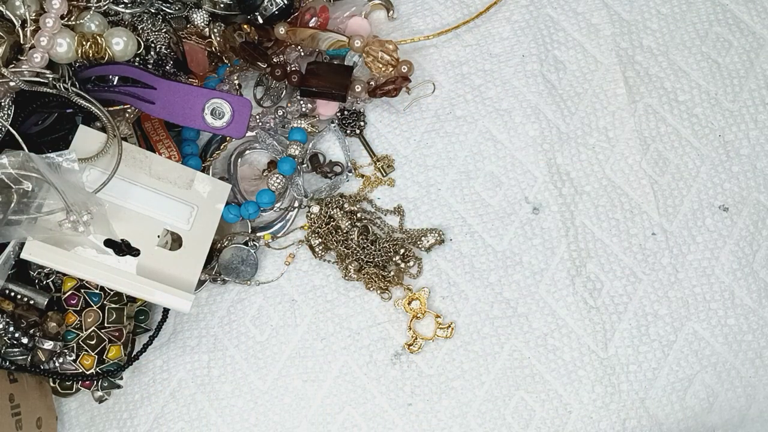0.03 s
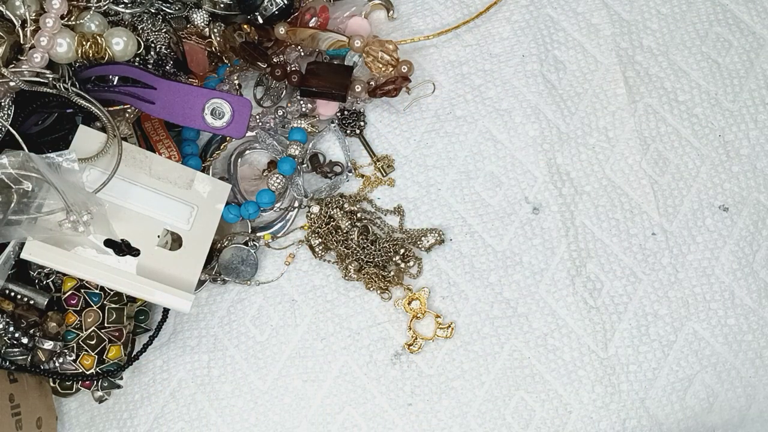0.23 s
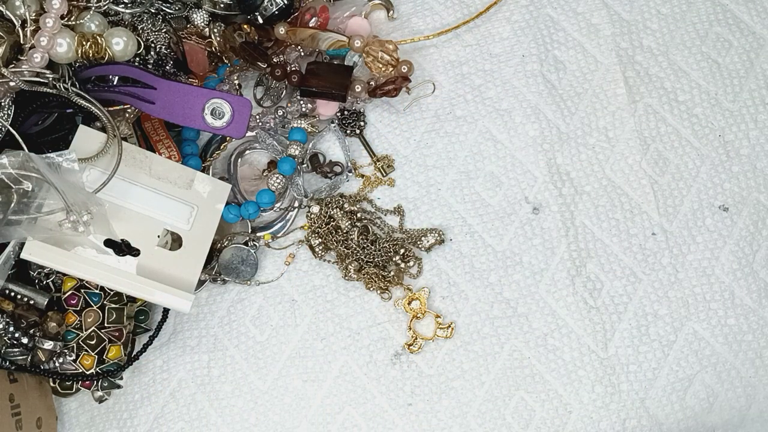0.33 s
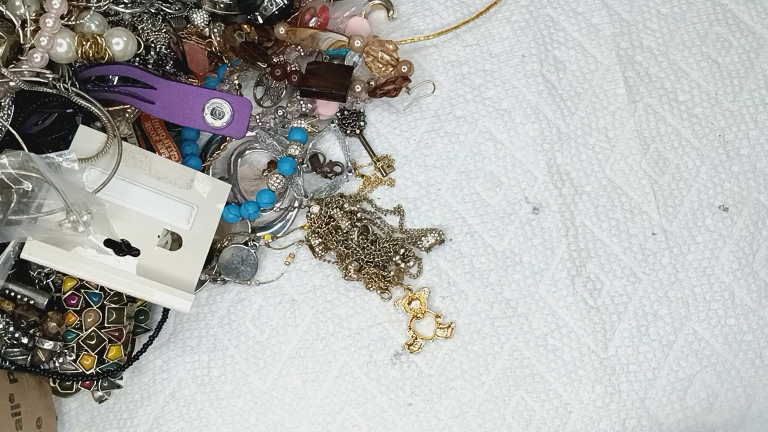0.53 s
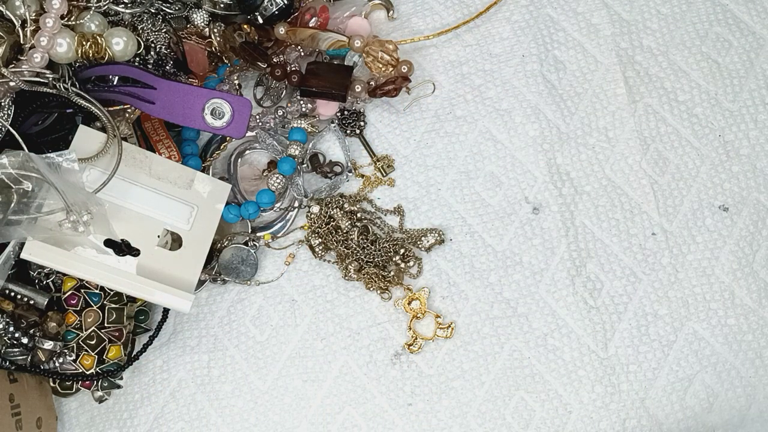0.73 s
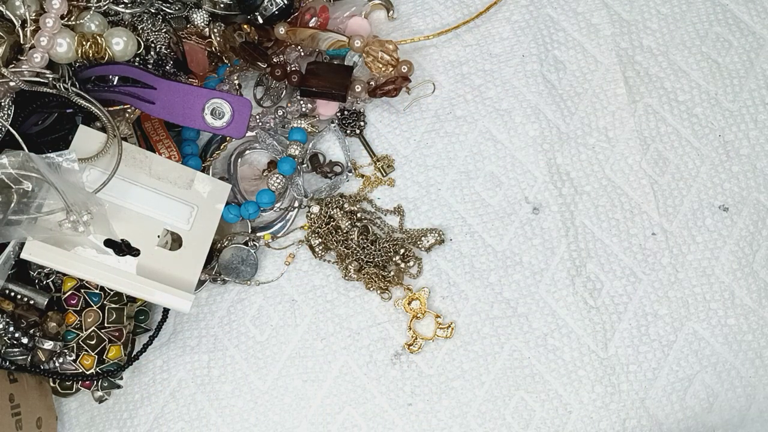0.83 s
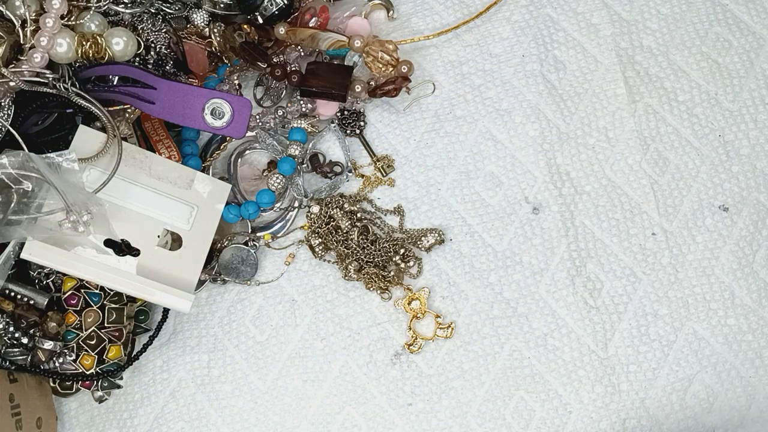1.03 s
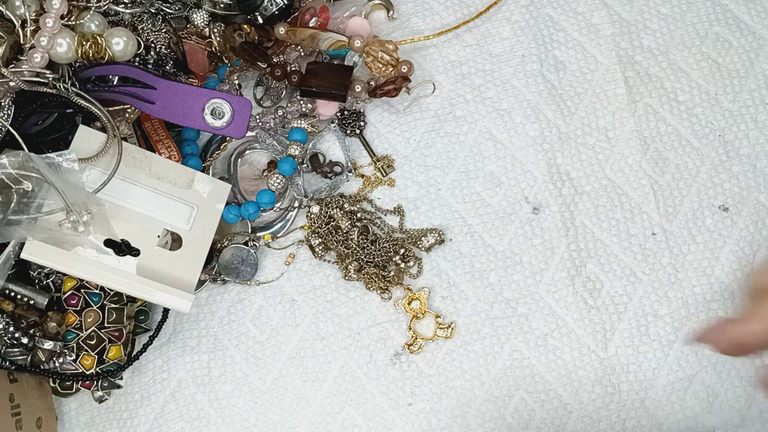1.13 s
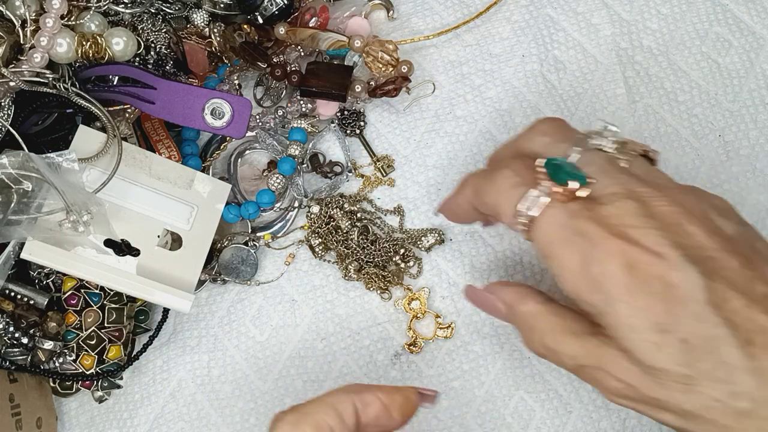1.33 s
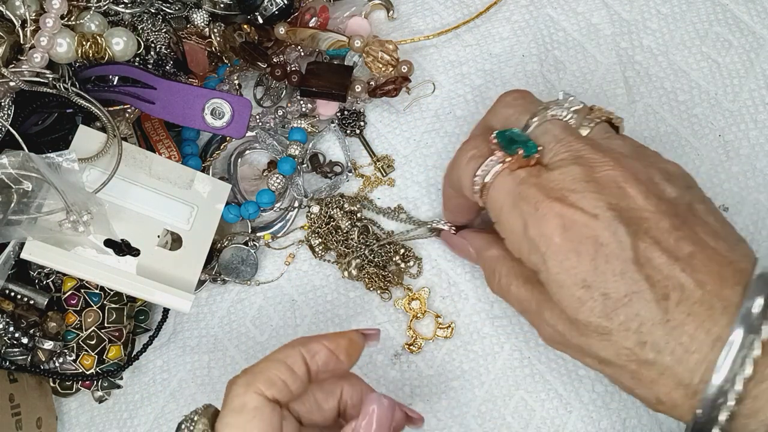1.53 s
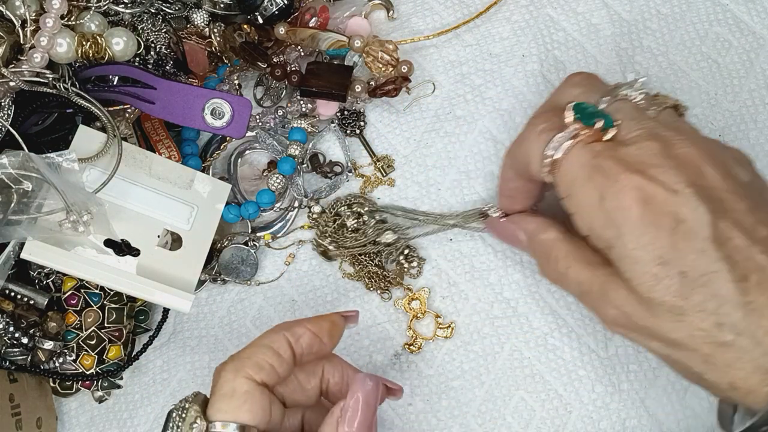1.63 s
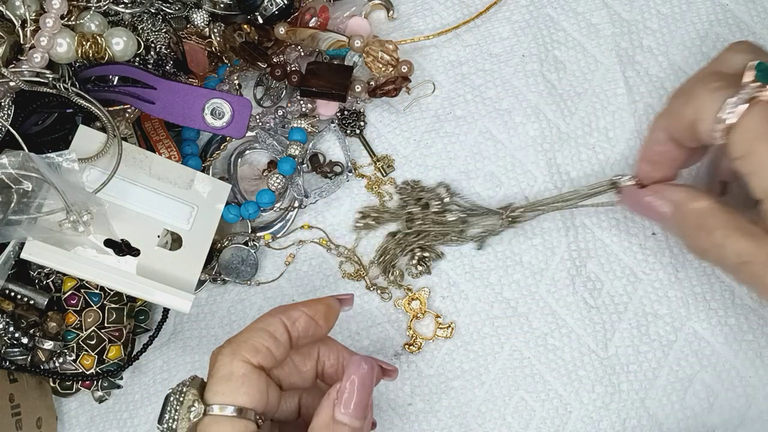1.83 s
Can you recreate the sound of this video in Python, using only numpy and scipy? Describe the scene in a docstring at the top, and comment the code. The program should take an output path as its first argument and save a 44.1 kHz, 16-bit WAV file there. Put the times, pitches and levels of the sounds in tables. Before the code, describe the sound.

Dragged jewelry chain gives one short, rough, clattering scrape near the microphones, mostly left; afterwards near-quiet with tiny bright ticks, a denser clink cluster with a dull padded knock, and faint sliding links in a small room.

```python
"""One loud rasp close on the left, probably a dragged chain: dense link impacts and single catches drive
resonances, and a faint squeak follows. Fine links rustle before it, as costume jewelry is sorted.
Small pieces clink as noise ticks with short jingles, and some ring on as dying sines.
A hand bumps the cloth-covered table in low modes, and a thin chain is drawn out of the heap as fine grains.
Behind it lies a small, quiet room: coloured noise and a faint, wavering hum."""
import sys
import numpy as np
from scipy import signal
from scipy.fft import rfft, irfft
from scipy.io import wavfile
from scipy.ndimage import uniform_filter1d

SR = 44100
rng = np.random.default_rng(int(sys.argv[2]) if len(sys.argv) > 2 else 0)


def dump_mix(stems):
    """Bounce the given channels to the path in sys.argv[1] as a 16-bit WAV at rate SR."""
    frames = np.atleast_2d(stems).T  # one column per channel
    limited = np.clip(frames, -1, 1)  # hard clip at full scale
    pcm = np.round(limited * 32767).astype(np.int16)
    wavfile.write(sys.argv[1], SR, pcm)


N = 83790  # length of the scene in samples

# Force of the rasp: (time [s], relative level [dB])
RASP_FORCE = [(.226, -13), (.232, -2.5), (.243, -4), (.254, -3), (.265, -0.5), (.295, -1), (.33, -2),
              (.348, -5.5), (.362, -15.5), (.395, -22.5), (.425, -44.5)]
# Force of its treble: (time [s], relative level [dB])
RASP_TREBLE_FORCE = [(.226, -10.5), (.233, 1.5), (.242, -2), (.26, 1), (.332, -1.5), (.346, -9),
                     (.362, -22), (.395, -19), (.455, -39.5)]
# Moving resonance of the scrape: (time [s], pitch [Hz], level [dB])
SCRAPE_GLIDE = [(.245, 2900, -41.5), (.254, 2660, -33.5), (.268, 2050, -34.5), (.29, 2420, -40),
                (.312, 3050, -33.5), (.335, 2650, -32.5), (.365, 2600, -50), (.398, 3070, -49),
                (.43, 2900, -71)]
# Links that catch: (time [s], relative strength [dB], clack pitch [Hz], relative clack level [dB])
LINK_CATCHES = [(0.2252, -16, 431, -9), (0.2328, -8, 2170, -14), (.2505, 1, 862, 6.5),
                (.259, -2, 1992, 1.5), (0.2657, -2.5, 1600, 2.5), (0.2865, -0.5, 1977, -4),
                (0.295, -4, 1261, 6), (0.2996, -6, 458, 0.5), (0.307, 3.5, 1280, -2.5),
                (.318, 2, 2937, -2.5), (0.329, 0.5, 1303, -7.5), (0.3405, -9.5, 620, 0.5),
                (.369, -15.5, 1446, -11.5), (0.383, -16.5, 2330, -15.5), (0.393, -23, 3040, -25.5)]
# Spectrum of the rasp's body: (frequency [Hz], relative level per Hz [dB])
RASP_BODY_COLOUR = [(35, -57), (70, -31), (159, -13), (215, -20.5), (457, -9.5), (723, -2), (848, 0),
                    (1120, -6), (1290, -4), (1450, -5.5), (1960, -2), (4090, -5.5), (7000, -12),
                    (9100, -44), (15400, -120)]
# Spectrum of its bright links: (frequency [Hz], relative level per Hz [dB])
RASP_LINK_COLOUR = [(3530, -45), (6000, -11.5), (7190, -6.5), (7550, -9.5), (10000, 3), (11800, -10.5),
                    (14000, -15.5), (15200, -16), (16000, -31.5)]
# Stereo placement of the rasp: (frequency [Hz], left minus right [dB])
RASP_PLACEMENT = [(60, 4), (99, 7.5), (160, 18), (270, 13.5), (450, 17), (740, 11), (1220, 14), (2010, 16),
                  (3330, 7), (5500, 6), (9080, -5), (15000, -8)]
# Room resonances that the rasp excites: (frequency [Hz], relative level [dB])
ROOM_MODES = [(173, -13), (455, -8), (578, -5), (656, -4), (833, 0), (873, -2), (991, -2), (1251, 1),
              (1349, -7), (1551, -5), (1617, -2), (1836, -7), (1988, 0), (3443, -9)]
RASP_PER_S, RASP_SPREAD_DB, RASP_GRAIN_S = 1300, 2.2, .0012  # impacts per second, unevenness, decay
CATCH_DB, CATCH_LENGTH_S = -4, 0.0035
CLACK_DB, CLACK_T60_S, CLACK_RISE_S, CLACK_LOW_HZ = 2.5, 0.05, 0.0031, 330
SCRAPE_WIDTH_HZ, MODE_T60_S = 1200, 0.16
BODY_DB, LINKS_DB, MODES_DB, RASP_ROOM_DB = -41.5, -38, -49, -6.5


def rasp():
    """Links run fast over an edge and sometimes catch; the scrape glides and the room's modes ring along."""
    grains = chatter(contacts(RASP_PER_S, RASP_SPREAD_DB), RASP_GRAIN_S)
    drive = grains * level(RASP_FORCE)

    catches, clacks = np.zeros((2, 2, N))
    for s, db, hz, clack_db in LINK_CATCHES:
        add(catches, s, amp(db + CATCH_DB) * tick(CATCH_LENGTH_S))
        clack = ring(hz, CLACK_T60_S, CLACK_RISE_S)
        add(clacks, s, amp(clack_db + CLACK_DB) * delayed(clack))
    clack_low_cut = signal.butter(2, CLACK_LOW_HZ, "highpass", fs=SR, output="sos")
    clacks = signal.sosfilt(clack_low_cut, clacks)

    body = evened(colour(drive + catches, RASP_BODY_COLOUR) + clacks)
    treble = grains * level(RASP_TREBLE_FORCE) + 0.47 * catches
    links = evened(colour(treble, RASP_LINK_COLOUR))

    scrape_hz, scrape_gain = glide(SCRAPE_GLIDE)
    scrape_grains = chatter(contacts(RASP_PER_S, RASP_SPREAD_DB), RASP_GRAIN_S)
    scrape = scrape_gain * evened(resonate(scrape_grains, scrape_hz, SCRAPE_WIDTH_HZ))

    modes = np.zeros(N)
    for hz, db in ROOM_MODES:
        modes += amp(db) * evened(convolve(drive[0], ring(hz, MODE_T60_S))[0])

    wet = room(amp(BODY_DB) * body + scrape, RASP_ROOM_DB)
    wet = wet + room(amp(LINKS_DB) * links, wet_db=-4.0)
    return lean(wet + amp(MODES_DB) * delayed(evened(modes)), RASP_PLACEMENT)


# Squeak after the rasp: (time [s], pitch [Hz], relative level [dB])
SQUEAK_GLIDE = [(.464, 1668, -66), (.474, 1694, -61), (.485, 1785, -64), (.499, 1790, -73),
                (.507, 1680, -78)]
SQUEAK_JITTER = .05  # rms share of the pitch
RUB_RATIO, RUB_WIDTH_HZ, RUB_DB = 1.25, 770, -1.5  # rub pitch over squeak pitch, bandwidth, rub over tone


def squeak():
    """A faint metal squeak after the rasp: a tone of jittering pitch with rubbing noise a little above it."""
    hz, gain = glide(SQUEAK_GLIDE)
    jitter = evened(uniform_filter1d(rng.standard_normal(N), size=60))
    unsteady_hz = hz * (1 + SQUEAK_JITTER * jitter)
    tone = evened(np.sin(2 * np.pi * np.cumsum(unsteady_hz) / SR))
    rub = evened(resonate(rng.standard_normal(N), hz * RUB_RATIO, RUB_WIDTH_HZ))
    voice = gain * (tone + amp(RUB_DB) * rub)
    return room(pan(left_db=15.5) * delayed(voice), wet_db=-2)


# Small metal pieces touching: (time [s], relative level [dB], tick decay [s],
# relative level of the dull part [dB], left minus right [dB], relative level of the jingle [dB])
PIECE_TOUCHES = [(0.748, -55.5, 0.0013, -16, 1, -2.5), (0.7666, -56, .0014, -20, 3, 6),
                 (0.790, -58, 0.0023, -24, 2, 11), (0.802, -51, 0.0034, -20.5, -2, 4),
                 (0.87, -74, .004, 3.5, -8, -10), (0.9353, -55, .0012, -21, 0, -4.5),
                 (1.056, -56.5, 0.0045, -15, 2, 7), (1.07, -55.5, 0.0029, -11, -3, 6.5),
                 (1.151, -59, 0.0024, -23, 8.5, -10), (1.3228, -50.5, 0.0011, -18, 0, -4),
                 (1.378, -47, 0.0017, -20, -10, 1), (1.381, -41.5, 0.002, -23, -2, -1),
                 (1.41, -36, 0.00089, -17.5, -7, -14), (1.4117, -44.5, .0015, -6.5, -3, -8),
                 (1.4185, -56, .0006, -16, -3, -7), (1.424, -57, 0.0016, -5, -3, -4),
                 (1.4316, -53, 0.0018, -11, 3, -6), (1.4345, -44.5, 0.0022, -7, -13, -13),
                 (1.4383, -41.5, 0.0024, -14.5, -5, -6), (1.44, -47, 0.00092, -11.5, -4, -3),
                 (1.449, -61, .001, -9, -3, -5), (1.4575, -57, .0015, -11, -7, -4),
                 (1.461, -58, .0015, -19, -3, -5), (1.52, -58, 0.0022, -27, -7, -7),
                 (1.536, -58.5, 0.0031, -19, -9, 3.5), (1.576, -51.5, 0.0025, -15, -6, 0.5),
                 (1.585, -52.5, 0.0067, -12, -3, 2), (1.721, -41, 0.0018, -21.5, -2, -6),
                 (1.797, -55, 0.0015, -9.5, -8, -8), (1.829, -56, 0.00076, -14.5, -1, -8),
                 (1.8694, -42, .0017, -17.5, -5.5, -10),]
# Spectrum of the bright tick: (frequency [Hz], relative level per Hz [dB])
BRIGHT_COLOUR = [(2940, -50), (5000, -24), (5570, -8), (7200, -16), (7820, 3), (10100, 7), (12400, -13),
                 (15200, -16), (16000, -35.5)]
# Spectrum of the duller part: (frequency [Hz], relative level per Hz [dB])
DULL_COLOUR = [(500, -41), (1200, -5.5), (2500, 0), (4000, -0.5), (5600, 1.5), (7000, 1.5), (9000, -7.5),
               (16000, -43)]
# Pieces that ring on: (time [s], pitch [Hz], relative level [dB], 60 dB decay [s], left minus right [dB])
RINGING_PIECES = [(.148, 10400, -51, .025, -5), (.1545, 10450, -46.5, 0.021, -5),
                  (.802, 8900, -54, .08, -5), (.9355, 9140, -64.5, .15, -7), (1.0585, 9230, -55.5, 0.2, -9),
                  (1.0585, 5600, -62, .06, 4), (1.3229, 10010, -45.5, 0.1, -6),
                  (1.3815, 9140, -40.5, 0.086, -21), (1.538, 5470, -53, 0.022, 18),
                  (1.890, 10500, -46, .03, -3)]
# Partials of a ringing piece: (multiple of the pitch [ratio], relative level [dB])
RING_PARTIALS = [(1.001, -2.5), (1.126, -21), (1.631, -23.5)]
BRIGHT_DB, CLINK_ROOM_DB, DULL_LEFT_DB = -6.5, -8, 7.5
JINGLE_DB, RING_ROOM_DB, RING_RATTLE = -10, -10, .3  # rattle: rms depth of the level flutter


def clinks():
    """A touch is a bright tick, a duller part and a jingle; some pieces ring, rattling on their neighbours."""
    bright, dull, jingle, rings = np.zeros((4, 2, N))
    for s, db, length_s, dull_db, left_db, jingle_db in PIECE_TOUCHES:
        add(bright, s, amp(db) * pan(left_db) * tick(length_s))
        add(dull, s, amp(db + dull_db) * pan(DULL_LEFT_DB) * tick(length_s))
        add(jingle, s, amp(db + jingle_db + JINGLE_DB) * pan(left_db) * trinket())
    for s, hz, db, t60, left_db in RINGING_PIECES:
        piece = sum(amp(db + part_db) * ring(hz * ratio, t60) for ratio, part_db in RING_PARTIALS)
        add(rings, s, pan(left_db) * piece)
    flutter = evened(uniform_filter1d(rng.standard_normal((2, N)), size=90))
    rattle = 1 + RING_RATTLE * flutter
    touches = amp(BRIGHT_DB) * colour(bright, BRIGHT_COLOUR) + colour(dull, DULL_COLOUR) + jingle
    return room(touches, CLINK_ROOM_DB) + room(rings * rattle, RING_ROOM_DB)


# Modes of the small pieces, excited by chance: (frequency before detuning [Hz], relative level [dB])
PIECE_MODES = [(5520, -13.5), (7050, -15), (7950, -7), (8900, 4), (9420, 3.5), (9900, -3.5), (10500, 1),
               (11150, 6.5), (11600, 0), (12750, -2), (14350, -1), (14880, -13), (15250, -8)]
TRINKET_T60_S, TRINKET_DETUNE = .04, .02  # detune: typical random share of the frequency


def trinket(size=8192):
    """The ring of a small piece, with a new mix of modes at every touch."""
    out = np.zeros((2, size))
    for hz, db in PIECE_MODES:
        strength = amp(db) * rng.standard_normal((2, 1))
        detuned_hz = hz * (1 + TRINKET_DETUNE * rng.standard_normal())
        out += strength * ring(detuned_hz, TRINKET_T60_S)[:size]
    return out


# Fine chain sliding: (time [s], relative level [dB])
SLIDE_FORCE = [(0, -53), (.03, -49), (.065, -45.5), (.09, -49), (.135, -56), (.165, -51.5), (.21, -64.5),
               (.5, -75.5), (.9, -80), (1.1, -69.5), (1.3, -73), (1.56, -63.5), (1.62, -59), (1.74, -57),
               (1.9, -56)]
# Spectrum of the sliding links: (frequency [Hz], relative level per Hz [dB])
SLIDE_SPECTRUM = [(1760, -40), (3000, -16.5), (4500, -20.5), (5250, -16), (6130, -17), (8170, -9),
                  (9940, 1.5), (12700, -10.5), (14900, -17.5), (16000, -4.5)]
SLIDE_PER_S, SLIDE_SPREAD_DB, SLIDE_LEFT_DB, SLIDE_ROOM_DB = 2200, 1.5, -0.5, -5
RATTLE_PER_S, RATTLE_DB = 300, -22.5  # second, sparser train


def slide():
    """Thousands of tiny link contacts as a fine chain moves, over a sparser and fainter train of rattles."""
    links = contacts(SLIDE_PER_S, SLIDE_SPREAD_DB)
    rattles = amp(RATTLE_DB) * contacts(RATTLE_PER_S, spread_db=-1.5)
    grains = chatter((links + rattles) * level(SLIDE_FORCE), length_s=0.0016)
    return room(colour(grains, SLIDE_SPECTRUM) * pan(SLIDE_LEFT_DB), SLIDE_ROOM_DB)


# Soft bumps on the table: (time [s], relative level [dB], pitch [Hz], 60 dB decay [s])
TABLE_BUMPS = [(1.2389, -49, 173, .05), (1.3775, -52.5, 100, 0.076), (1.3804, -41, 180.6, 0.081),
               (1.3842, -50, 290, 0.057), (1.438, -64, 149, 0.18)]
# Modes of the table top: (frequency [Hz], relative level [dB], 60 dB decay [s])
TABLE_MODES = [(235, 1, 0.086), (401, -5.5, 0.039), (570, 0, 0.045), (736, -6, 0.042), (990, -4, 0.037),
               (1220, -3, 0.028), (1490, -12, 0.046)]
# Spectrum of the scuff: (frequency [Hz], relative level per Hz [dB])
SCUFF_SPECTRUM = [(1200, 2.5), (2700, -10.5), (5000, -32)]
BUMP_RISE_S, BUMP_LEFT_DB = 0.0021, 13.5
KNOCK_S, KNOCK_DB, KNOCK_LEFT_DB = 1.3005, -50.5, 14  # start, level, left minus right
SCUFF_DB, SCUFF_LENGTH_S = -55.5, 0.0086


def table():
    """The hand lands on the padded table: low bumps and one dull knock with a short scuff."""
    out = np.zeros((2, N))
    for s, db, hz, t60 in TABLE_BUMPS:
        add(out, s, amp(db) * pan(BUMP_LEFT_DB) * delayed(ring(hz, t60, BUMP_RISE_S)))
    knock = np.zeros(SR // 2)
    for k, (hz, db, t60) in enumerate(TABLE_MODES):
        knock += (-1) ** k * amp(db) * ring(hz, t60, BUMP_RISE_S)  # neighbouring modes in opposite phase
    add(out, KNOCK_S, amp(KNOCK_DB) * pan(KNOCK_LEFT_DB) * delayed(knock))
    scuff = colour(tick(SCUFF_LENGTH_S), SCUFF_SPECTRUM)
    add(out, KNOCK_S, amp(SCUFF_DB) * pan(KNOCK_LEFT_DB) * scuff)
    return room(out, wet_db=-5.0)


# Spectrum of the room noise: (frequency [Hz], relative level per Hz [dB])
AIR_SPECTRUM = [(15, -45.5), (25, -19.5), (64, -6.5), (102, -2), (206, -2), (451, -9), (624, -9),
                (734, -11), (863, -13.5), (1070, -14.5), (2280, -19.5), (4610, -27.5), (8360, -29),
                (9070, -24.5), (16000, -45.5)]
# Stereo placement of the noise: (frequency [Hz], left minus right [dB])
AIR_PLACEMENT = [(60, 6), (110, 14), (200, 12.5), (380, 15.5), (700, 13), (1290, 16), (2380, 17),
                 (4400, 6.5), (8120, 1.5), (15000, -15.5)]
# Left-right likeness of the noise: (frequency [Hz], correlation [0 to 1])
AIR_LIKENESS = [(60, 0.29), (130, 0.64), (290, 0.43), (640, 0.6), (1400, 0.2), (4000, 0.086)]
# Hum tones: (frequency [Hz], relative level [dB])
HUM_TONES = [(119, -70), (241, -74)]
AIR_DB, HUM_LEFT_DB = -62, 16.5


def air():
    """Steady, partly correlated room noise with a faint hum whose phase wavers slowly."""
    hz, t = np.fft.rfftfreq(N, 1 / SR), np.arange(N) / SR
    a, b = rfft(rng.standard_normal((2, N)))
    same = np.clip(read(AIR_LIKENESS, hz), -1, 1)
    lead = np.exp(2j * np.pi * hz * PORT_LAG_S)  # the shared part reaches the right first
    right = same * lead * a + np.sqrt(1 - same ** 2) * b
    noise = evened(irfft(np.array([a, right]) * amp(read(AIR_SPECTRUM, hz)), N))
    waver = evened(irfft(rfft(rng.standard_normal(N)) * (hz < 6), N))
    hum = sum(amp(db) * evened(np.sin(2 * np.pi * f * t + .5 * waver)) for f, db in HUM_TONES)
    return lean(amp(AIR_DB) * noise, AIR_PLACEMENT) + pan(HUM_LEFT_DB) * delayed(hum)


# Decay of the room: (frequency [Hz], 60 dB decay [s])
ROOM_DECAY = [(100, 0.53), (500, 0.18), (2000, 0.23), (5000, 0.24), (10000, 0.19), (16000, 0.12)]


def room(x, wet_db, size=256):
    """Adds a short diffuse tail, each band dying at its own speed."""
    hz, t, z = signal.stft(rng.standard_normal((2, SR // 2)), SR, nperseg=size)
    decay = amp(-60 * t / read(ROOM_DECAY, hz)[:, None])
    tail = signal.istft(z * decay, SR, nperseg=size)[1]
    tail = tail * np.minimum(np.arange(tail.shape[1]) / SR / 0.0034, 1)  # 3.4 ms fade-in
    return x + amp(wet_db) * convolve(x, tail / np.linalg.norm(tail[0]))


CLICK_WINDOW_S, TICK_RISE_S = .01, .0002  # a tick has rms 1 over the click window


def tick(length_s, size=2048):
    """One contact: a noise burst that swells and dies within milliseconds, unlike at each microphone."""
    t = np.arange(size) / SR
    burst = rng.standard_normal((2, size)) * np.exp(-t / length_s) * (1 - np.exp(-t / TICK_RISE_S))
    return burst / np.linalg.norm(burst, axis=1, keepdims=True) * np.sqrt(CLICK_WINDOW_S * SR)


def contacts(per_s, spread_db):
    """Random train of link impacts of uneven strength and either sign, at rms 1."""
    size = amp(spread_db * np.minimum(rng.exponential(1, N), 4))
    return evened(size * (rng.random(N) < per_s / SR) * rng.choice([-1, 1], N))


def chatter(train, length_s, count=16):
    """Gives each impact one of several tick shapes."""
    which = rng.integers(0, count, N)
    grains = sum(convolve(train * (which == k), tick(length_s)) for k in range(count))
    return grains / np.sqrt(CLICK_WINDOW_S * SR)


def ring(hz, t60, rise_s=1 / SR):
    """One mode dying exponentially, 60 dB in t60, with a soft start if wanted."""
    t = np.arange(SR // 2) / SR
    return np.sin(2 * np.pi * hz * t) * np.exp(-np.log(1000) * t / t60) * np.minimum(t / rise_s, 1)


def resonate(x, hz, width_hz):
    """A resonance of gain 1 that follows the curve hz: shift down to zero, smooth, shift back up."""
    turn, r = np.exp(2j * np.pi * np.cumsum(hz) / SR), np.exp(-np.pi * width_hz / SR)
    smooth = signal.lfilter([(1 - r) ** 2], [1, -2 * r, r * r], x / turn + 1e-18)
    return 2 * (turn * smooth).real


PORT_LAG_S = .00058  # time by which the left microphone lags the right


def delayed(x):
    """One sound at both microphones, reaching the left one a little later."""
    late = np.concatenate([np.zeros(round(PORT_LAG_S * SR)), x])[:len(x)]
    return np.array([late, x])


def colour(x, points, size=4096):
    """Causal (minimum-phase) filter with the given spectrum and unit energy."""
    hz = abs(np.fft.fftfreq(size, 1 / SR))
    log_gain = np.log(amp(np.maximum(read(points, hz), -100)))
    response = np.fft.ifft(np.exp(np.conj(signal.hilbert(log_gain)))).real[:size // 2]
    return convolve(x, response / np.linalg.norm(response))


def lean(x, balance):
    """Tilts each frequency to the left or right."""
    return irfft(rfft(x, 2 * N) * pan(read(balance, np.fft.rfftfreq(2 * N, 1 / SR))))[:, :N]


def pan(left_db):
    """Left and right gains from the level difference, left minus right."""
    return amp(np.array([[.5], [-.5]]) * left_db)


def glide(points):
    """Pitch and gain over time from rows of (time [s], pitch [Hz], level [dB])."""
    s, hz, db = np.transpose(points)
    return np.interp(np.arange(N) / SR, s, hz), level(np.transpose([s, db]))


def level(points):
    """Gain over time from rows of (time [s], level [dB]), silent outside them."""
    s, db = np.transpose(points)
    return amp(np.interp(np.arange(N) / SR, s, db, left=-np.inf, right=-np.inf))


def read(points, hz):
    """Reads a table on a log-frequency axis."""
    f, value = np.transpose(points)
    return np.interp(np.log(hz + 1), np.log(f + 1), value)


def add(mix, s, sound):
    """Mixes a stereo sound in at a time."""
    part = mix[:, round(s * SR):][:, :sound.shape[1]]
    part += sound[:, :part.shape[1]]


def convolve(x, response):
    """Convolution per channel, cut to the scene's length."""
    return signal.fftconvolve(np.atleast_2d(x), np.atleast_2d(response), axes=1)[:, :N]


def evened(x):
    """Scales to rms 1."""
    return x / np.sqrt(np.mean(x ** 2) + 1e-20)


def amp(db):
    """Decibels to gain."""
    return 10 ** (np.asarray(db) / 20)


def scene():
    """Everything on and around the table."""
    return rasp() + squeak() + clinks() + slide() + table() + air()


LOW_CUT_HZ, EDGE_HZ = 40, 16100


def record(dry):
    """The recorder's low cut and band limit."""
    low_cut = signal.butter(2, LOW_CUT_HZ, "highpass", fs=SR, output="sos")
    thinned = signal.sosfilt(low_cut, dry)
    band_limit = signal.firwin(511, EDGE_HZ, window=("kaiser", 9), fs=SR)
    return signal.oaconvolve(thinned, band_limit[None], "same")


dry = scene()
out = record(dry)
dump_mix(out)
```